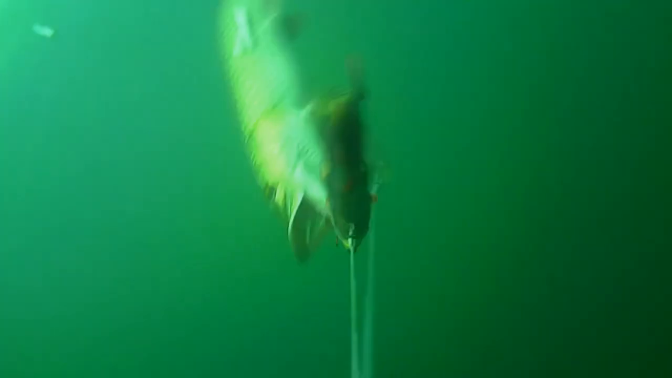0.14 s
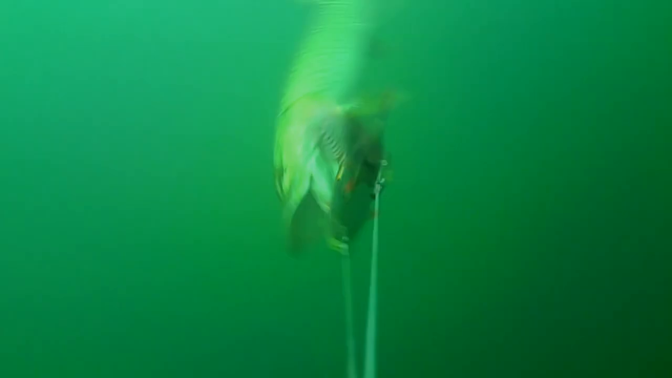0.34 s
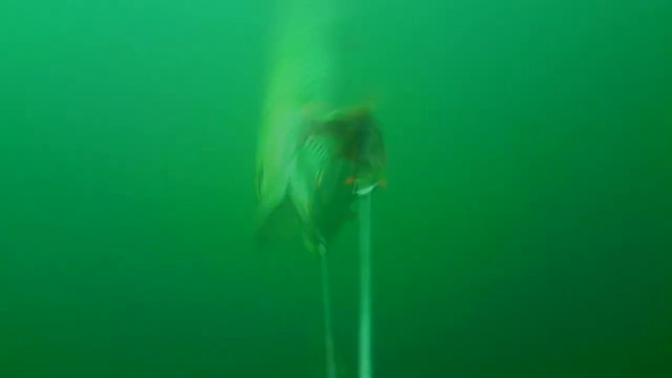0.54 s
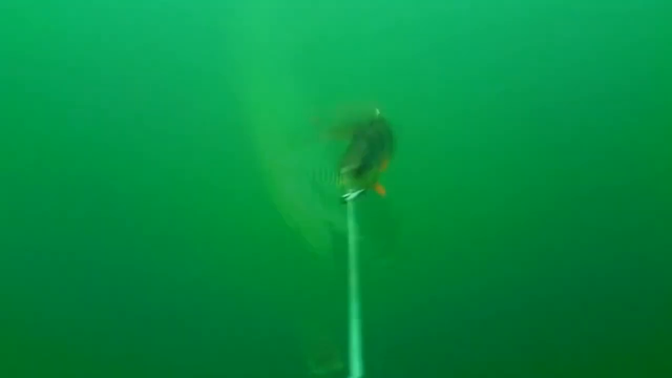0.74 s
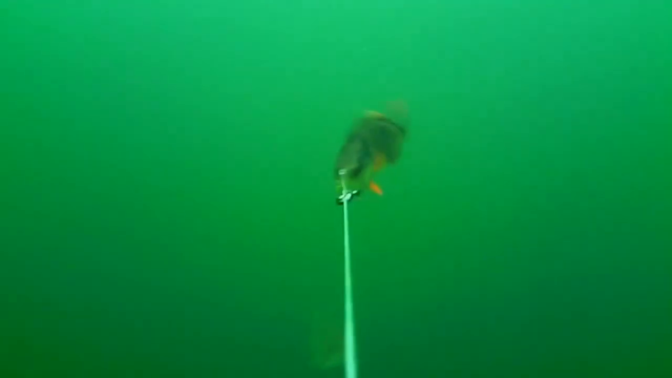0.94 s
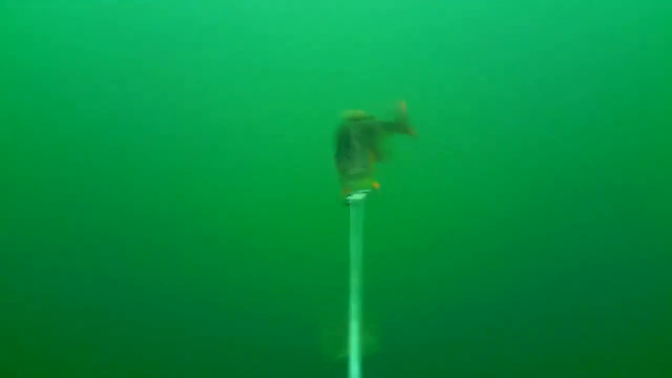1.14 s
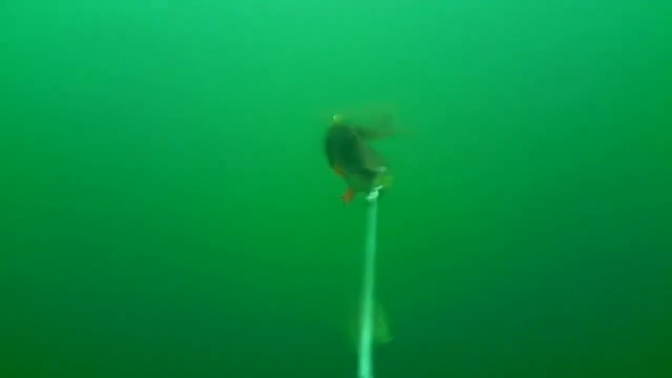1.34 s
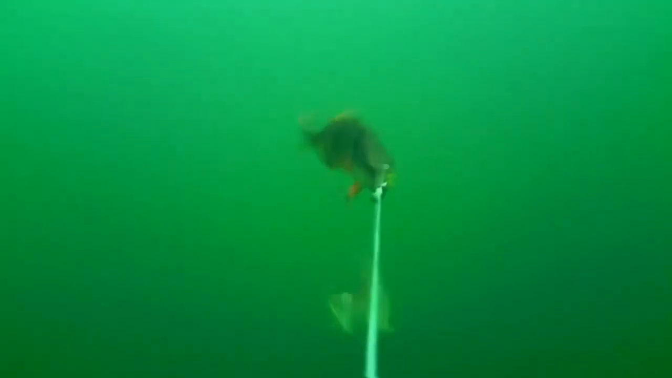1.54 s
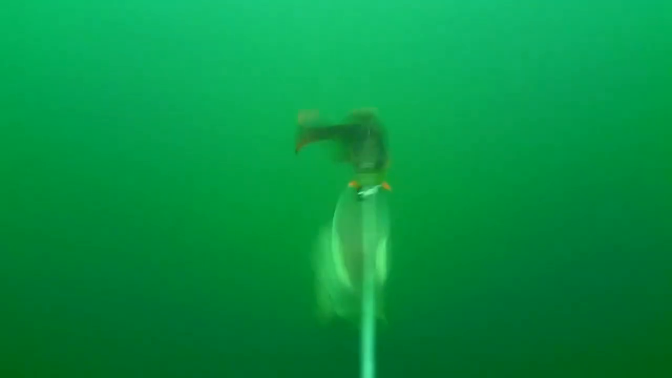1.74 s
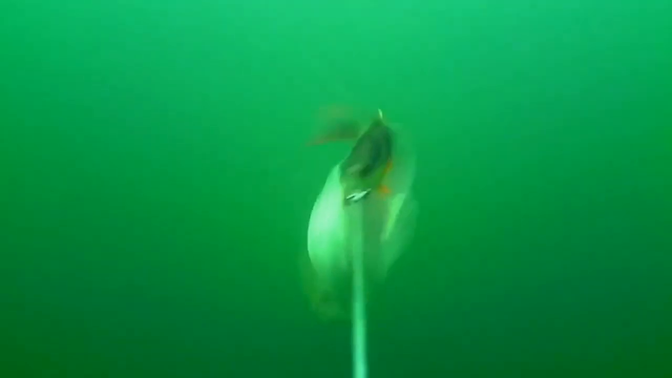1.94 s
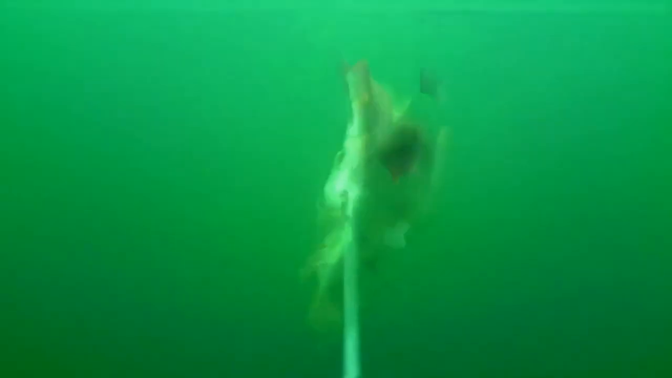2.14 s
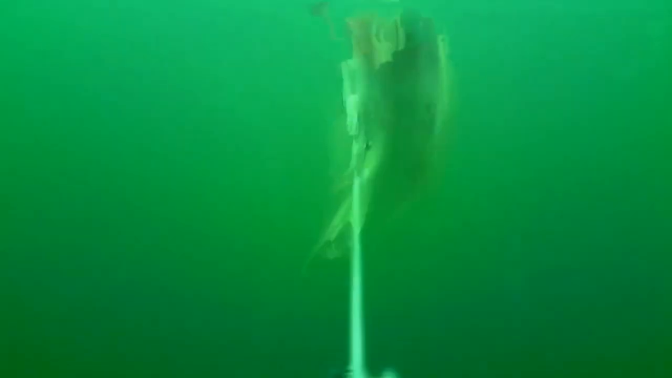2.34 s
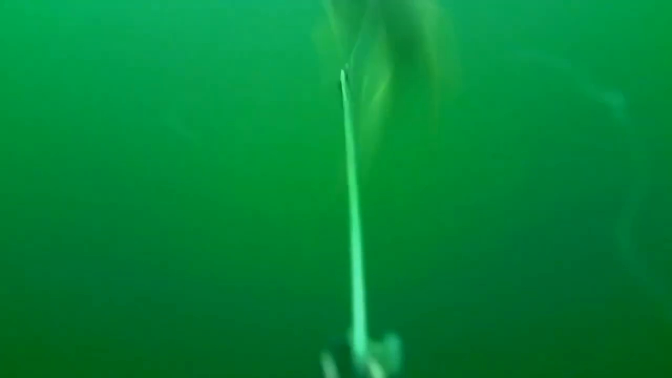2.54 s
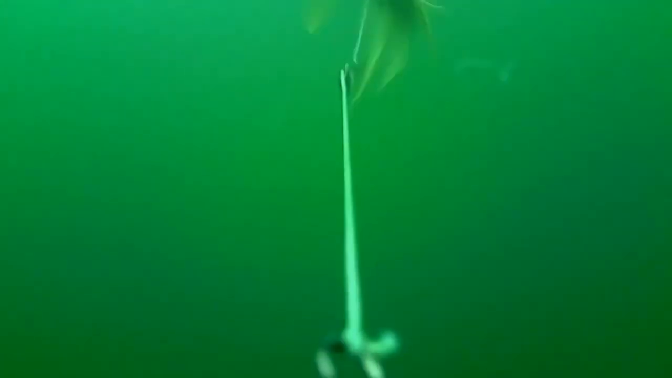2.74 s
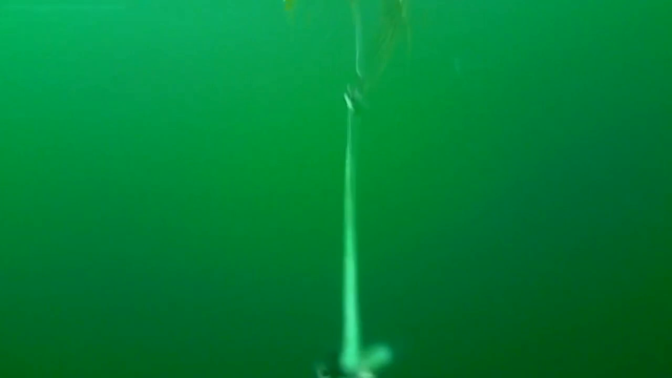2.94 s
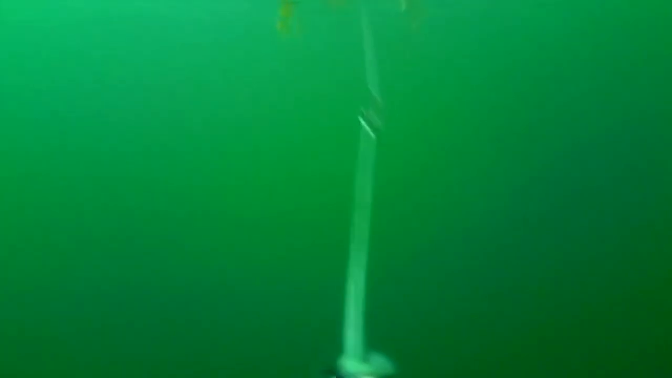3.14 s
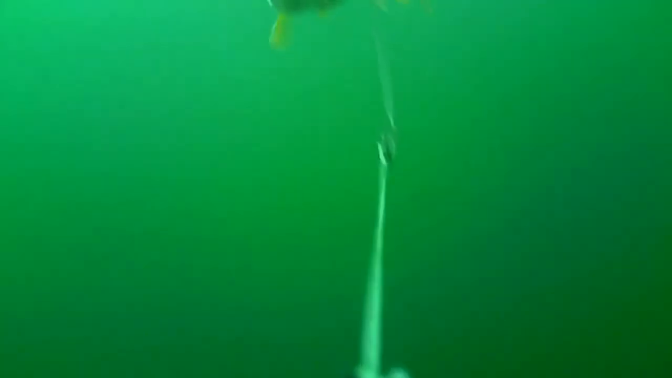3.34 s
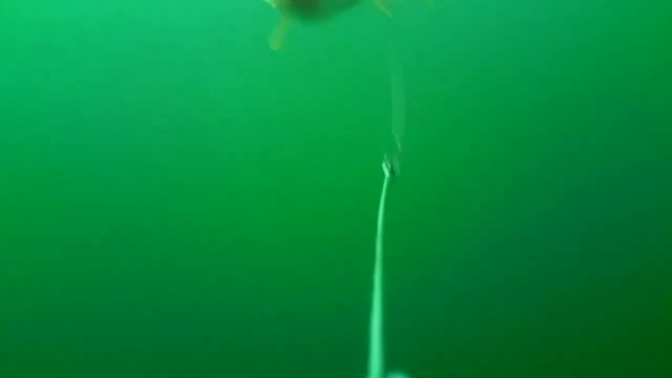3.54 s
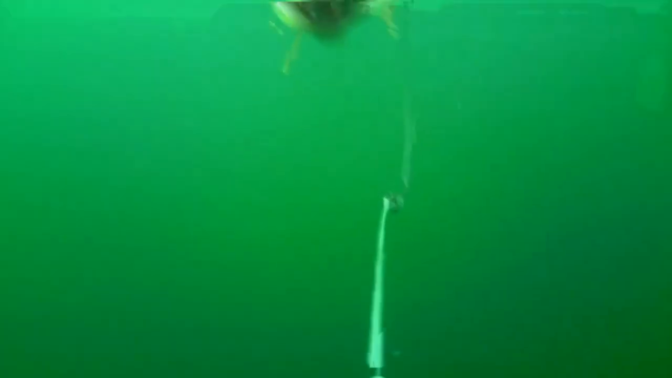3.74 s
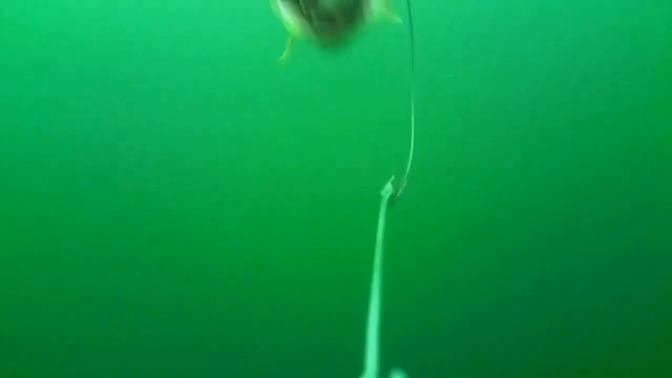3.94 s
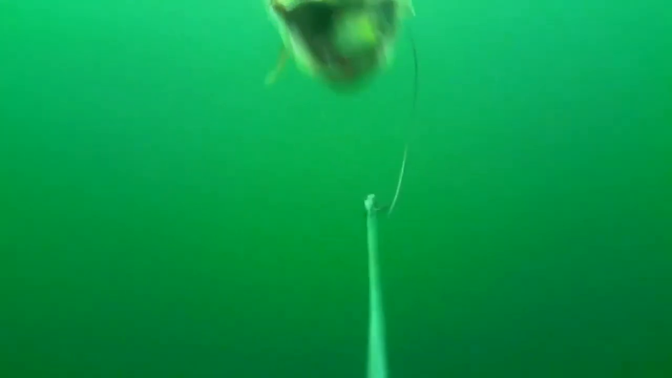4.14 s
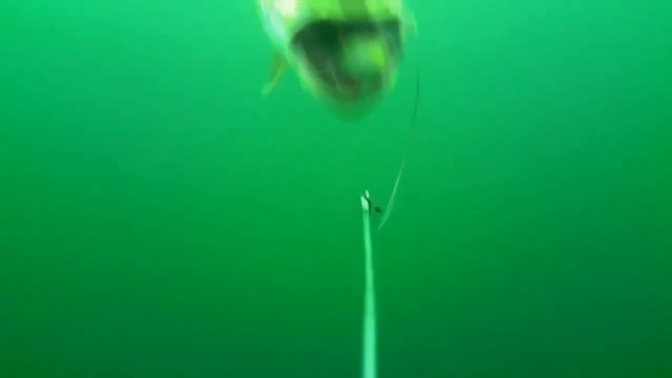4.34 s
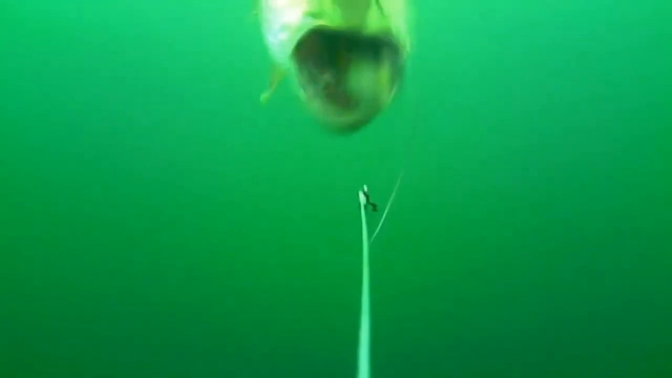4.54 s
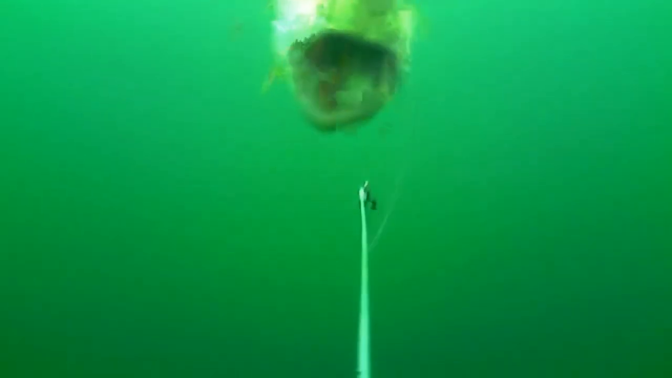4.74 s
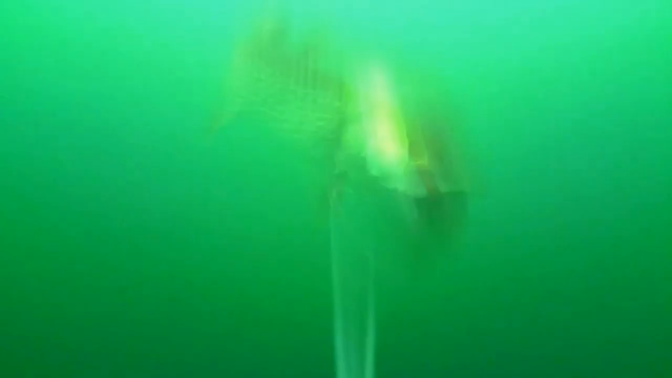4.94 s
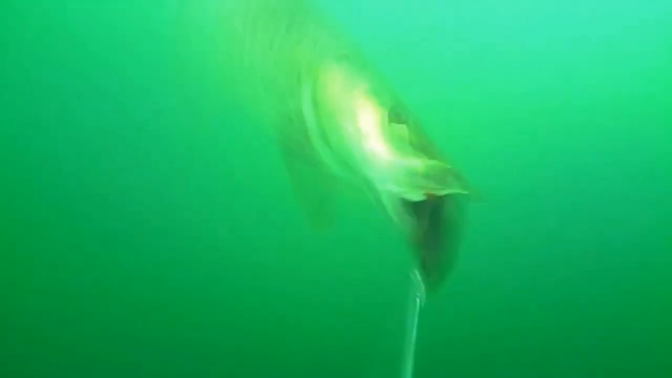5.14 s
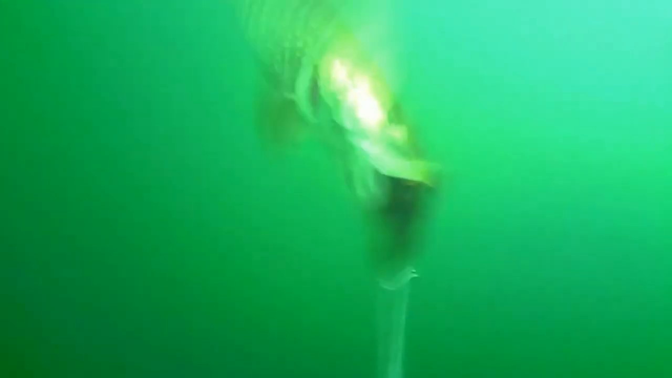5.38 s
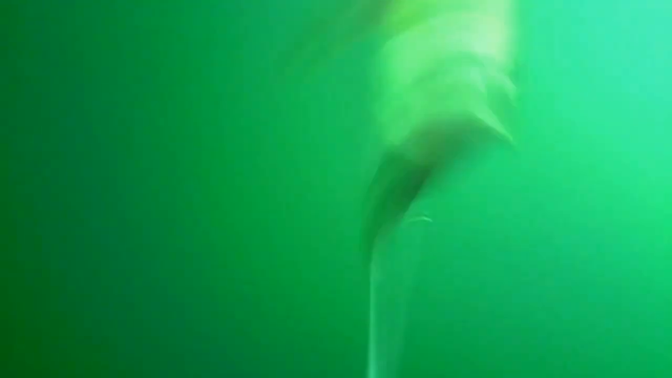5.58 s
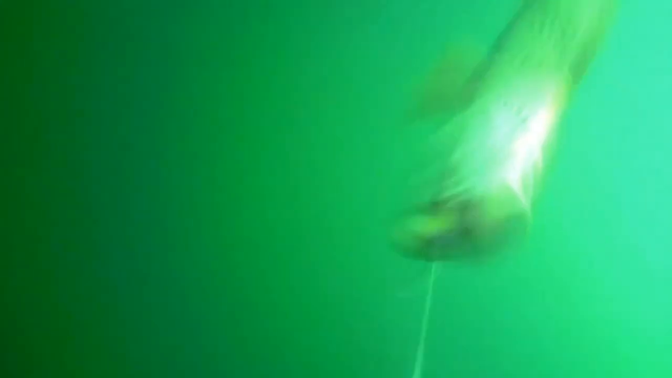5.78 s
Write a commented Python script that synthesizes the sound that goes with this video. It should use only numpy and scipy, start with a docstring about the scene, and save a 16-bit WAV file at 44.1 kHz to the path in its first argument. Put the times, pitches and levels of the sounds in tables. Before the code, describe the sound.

A fish strikes a lure towed in front of an underwater camera. A brief, high, speeded-up clatter cuts to a muffled water rumble and soft hiss, with light taps and a rubbing line. Hollow knocks bunch into a loud rattle, thin to faint ticks while a soft low moan passes, then return in the loudest, slightly distorted flurry. Everything is heard close, from inside the sealed housing.

```python
"""A fish strikes a towed underwater camera

A small camera in a sealed housing is towed on a line; a fish strikes the lure and jerks it.
Every tug knocks the housing, which rings briefly. The line rubs, the flow buffets the housing,
the microphone hisses, and a soft low moan passes. The first half second runs four times
as fast, with a short drop-out, then the sound cuts to about normal speed."""
import sys
import numpy as np
from scipy.fft import rfft, irfft, next_fast_len
from scipy.io import wavfile
from scipy.ndimage import map_coordinates

SR = 44100
rng = np.random.default_rng(int(sys.argv[2]) if len(sys.argv) > 2 else 0)


def generate_wav(sig):
    """Save sig (samples, or channels by samples) to the path in sys.argv[1] as 16-bit PCM at SR."""
    pcm = np.round(np.clip(np.atleast_2d(sig).T, -1, 1) * 32767).astype(np.int16)
    wavfile.write(sys.argv[1], SR, pcm)


N = 256220
CUT_S, FAST_SPEED = .473, 4  # speed raises pitches and shortens rings; tables are for speed 1
CAMERA_RATE_HZ, TOP_HZ = 8000, 15929


def amp(db):
    """Turn decibels into a gain."""
    return 10 ** (np.asarray(db) / 20)


def unit(x):
    """Scale a sound to an average (rms) level of 1."""
    return x / np.sqrt(np.mean(x ** 2) + 1e-20)


def curves(rows):
    """One value per sample for each column after the time."""
    times, *columns = np.transpose(rows)
    return [np.interp(np.arange(N) / SR, times, column) for column in columns]


def wobble(rate):
    """A smooth curve through `rate` random points a second."""
    return map_coordinates(rng.standard_normal(int(N * rate / SR) + 4), [np.arange(N) * rate / SR])


def filtered(x, response):
    """Weight each frequency in x by response(Hz)."""
    size = next_fast_len(x.shape[-1] + SR // 4)
    return irfft(rfft(x, size) * response(np.fft.rfftfreq(size, 1 / SR)), size)[..., :x.shape[-1]]


def modes(table, f):
    """How strongly a set of modes (the tones an object rings at) answers each frequency f."""
    return sum((-1) ** k * amp(db) * 1j * f * width / (hz * hz - f * f + 1j * f * width)
               for k, (hz, width, db) in enumerate(table))


def band(hz, width, f):
    """A filter shape that favours frequencies near hz."""
    return modes([(hz, width, 0)], f) ** 2


def coloured(points, speed):
    """Noise whose spectrum follows (f/Hz, level/dB) points."""
    f, db = np.transpose(points)
    shape = lambda hz: amp(np.interp(np.log(hz / speed + 1), np.log(f + 1), db))
    return unit(filtered(rng.standard_normal(N), shape))


# Tone of the hiss (first and last rows not played): f/Hz, level/dB
HISS_SPECTRUM = [(65, -31), (110, -2), (167, -5), (480, -8), (665, -16.5), (796, -12), (3850, -12.5),
                 (5000, -47.5), (8470, -120)]

def hiss(speed, level_db):
    """The microphone and the water hiss steadily."""
    return amp(level_db) * coloured(HISS_SPECTRUM[1:-1], speed)


# Faint copies of the sound in the treble: f/Hz (where it is mirrored), level/dB
MIRROR_POINTS = [(4000, -53.5), (8000, -63), (12000, -67), (16000, -68)]

def mirror_images(x):
    """Raising the sample rate leaves faint mirror images of the loud low tones in the treble."""
    carrier = sum(amp(db) * np.cos(2 * np.pi * hz * np.arange(N) / SR) for hz, db in MIRROR_POINTS)
    images = filtered(x, lambda hz: hz > 250) * carrier
    return filtered(images, lambda hz: hz > CAMERA_RATE_HZ / 2)


# Loudness of the moan: t/s, level/dB
MOAN_SWELL = [(3.2, -89.5), (3.32, -55), (3.5, -59), (3.68, -62), (3.8, -67), (3.9, -93)]

def moan():
    """A narrow band of noise near 70 Hz swells and fades."""
    spectrum = [(50, -41.5), (65, 13.5), (90, 0.5), (120, -42.5), (300, -120)]
    return amp(curves(MOAN_SWELL)[0]) * coloured(spectrum, 1)


# Tone of the water's rumble: f/Hz, level/dB
BUFFET_SPECTRUM = [(8, 9), (30, -4.5), (60, -14), (110, -17.5), (200, -57.5)]

def water_flow(level_db, speed):
    """Flow buffets the housing, and its swaying adds slow pressure swings."""
    buffet = amp(level_db + 1.3 * wobble(6 * speed)) * coloured(BUFFET_SPECTRUM, speed)
    sway = amp(-55) * wobble(5 * speed)
    return buffet + sway


def line_rub(pitch_hz, speed, lumpy_db):
    """The line drags in its eye: lumpy noise rings mostly the body mode nearest its pitch."""
    drag = rng.standard_normal(N) * amp(lumpy_db * wobble(45 * speed))
    ring = np.zeros(N)
    for hz, width, _ in BODY_MODES:
        nearness = np.exp(-(np.log(pitch_hz / hz) / 0.32) ** 2)
        ring += nearness * filtered(drag, lambda f: band(hz, 0.97 * width, f / speed))
    for group, db in (THUMP_MODES, -11.5), (RAP_MODES, -17), (CLICK_MODES, -39.5):
        ring += amp(db) * filtered(drag, lambda f: modes(group, f / speed))
    return unit(ring)


# The strain of towing: t/s, rub level/dB, buffet level/dB, rub f/Hz
TOW_STRAIN = [(0, -40, -42, 516), (.05, -50, -54, 488), (.1, -43, -49, 519.4), (.27, -52, -59.5, 499.4),
              (.45, -45.5, -63.5, 480.4), (.48, -57.5, -72, 350), (.64, -57, -43, 400),
              (.72, -60.5, -57, 368.3), (1.4, -58.5, -56, 380.6), (2.05, -66.5, -53.5, 424.6),
              (2.2, -29.5, -28, 487), (2.4, -52, -60, 485.4), (2.5, -48.5, -56, 427.4),
              (2.7, -63.5, -52.5, 491), (3.45, -62, -53.5, 490), (4.5, -67.5, -59.5, 468),
              (5.0, -61.5, -60, 489), (5.1, -37.5, -25.5, 512), (5.18, -25.5, -42, 510),
              (5.25, -34, -30, 481.5), (5.57, -47, -45, 480), (5.65, -20, -40, 516),
              (5.81, -40.5, -45, 408)]

def towing(speed, lumpy_db):
    """Rubbing and buffeting rise and fall with the strain on the line."""
    rub_db, buffet_db, pitch_hz = curves(TOW_STRAIN)
    return amp(rub_db) * line_rub(pitch_hz, speed, lumpy_db) + water_flow(buffet_db, speed)


# The housing's ringing tones in four groups, low to high: f/Hz, width/Hz, level/dB
THUMP_MODES = [(208, 41, 4.5)]
BODY_MODES = [(345, 148, -1.5), (489, 98, -0.64), (634, 75, 0.91)]
RAP_MODES = [(824, 34, -1.5), (935.6, 130, -4), (1053, 77, -4.5), (1306, 300, -11)]
CLICK_MODES = [(1938, 61, 2.5), (2327, 290, -13.5), (2750, 33, -12), (3530, 360, -19.5)]

def knock(body_db, pitch_hz, rap_db, click_db, shake_ms, speed, rap_width_hz):
    """A tug shakes the housing briefly and rings each group of modes at its own strength."""
    t = np.arange(4096) / SR * speed
    size = 2 * len(t)  # room to ring out
    f = np.fft.rfftfreq(size, 1 / SR) / speed
    progress = t / (max(shake_ms, 4) / 1000)
    thump_db = rng.normal(-17.5, 4)
    shake = rng.standard_normal(len(t)) * np.minimum(t / 0.0011, 1)
    soft = rfft(shake * amp(-30 * progress ** 2), size)
    sharp = rfft(shake * amp(-40 * progress), size)
    # The pull of the line favours one pitch, which also sounds as a round plop.
    body = irfft(soft * modes(BODY_MODES, f) * band(pitch_hz, 300, f))
    plop = np.sin(2 * np.pi * pitch_hz * t) * amp(-24 * progress ** 2) * (1 - np.exp(-t / 0.0029))
    body[:len(t)] += 1.2 * np.abs(body).max() * plop
    thump = irfft(soft * modes(THUMP_MODES, f) * band(220, 300, f))
    rap = irfft(sharp * modes(RAP_MODES, f) * band(963, rap_width_hz, f) ** 2)
    click = irfft(sharp * modes(CLICK_MODES, f) * band(3000, 3800, f))
    groups = (body, 0), (thump, thump_db), (rap, rap_db), (click, click_db)
    return sum(amp(body_db + db) * ring / np.abs(ring).max() for ring, db in groups)


# Tugs on the line: t/s, body peak level/dB, f/Hz, rap level/dB, click level/dB, shake length/ms
# (rap and click levels are relative to the body)
TUGS = [(0.0094, -28, 322, 8.5, -10, 21), (0.016, -27.5, 337, -3, -16, 11), (0.0196, -27, 372, -3, -31, 15),
        (0.0484, -43.5, 649, 11, -13, 20), (0.0548, -44, 640, 20, -20, 27), (0.0683, -28, 445, -8, -16, 11),
        (0.0867, -27, 350, -4, -33, 20), (0.0882, -36, 464, -2, -19, 26), (0.0958, -26, 374, -7, -21, 19),
        (0.1012, -24, 355, -3.5, -16, 25), (0.115, -31.5, 455, -18, -25, 18),
        (0.1183, -24, 346, -18, -23, 17), (0.1234, -27, 440, -31, -31, 27),
        (0.1376, -22, 363, -2.5, -10.5, 23), (0.1564, -33.5, 470, -30, -26.5, 22),
        (0.2145, -31, 445, 0, -19, 16), (0.2554, -34, 436, -12, -21, 18), (0.42, -30.5, 420, 1, -21, 20),
        (0.4392, -36, 606, -8, -19, 25.7), (0.4524, -35, 424, -23, -40, 26),
        (0.466, -33.5, 460, -11, -24, 23), (0.481, -49, 328, -19, -22, 16),
        (0.519, -44.5, 460, -2, -25, 18), (0.569, -40.5, 330, -10.5, -22, 24),
        (0.635, -23, 549, -15, -33, 33), (0.646, -22, 467, -29, -31, 16), (0.731, -49, 360, -12, -20, 15),
        (0.841, -41, 410, -13, -30, 15), (0.896, -43, 365, -16, -28, 9.8),
        (0.993, -44.5, 300, -9, -31.5, 16), (1.098, -50.5, 403, -5.5, -20, 38),
        (1.152, -64, 348, -12, -20, 26), (1.213, -55, 312, -5, -20, 13), (1.263, -46, 377, -11, -22, 21),
        (1.303, -49, 420, -9, -22, 41), (1.324, -46.5, 395, -20, -24, 16), (1.364, -47, 340, -18, -25, 28),
        (1.413, -24, 563, -32, -46, 9.8), (1.46, -35.5, 348, -8.5, -34, 22),
        (1.478, -45, 368, -10, -27, 25), (1.535, -46.5, 455, -15, -18, 11),
        (1.589, -40.5, 348, -16, -33, 28), (1.633, -51, 322, -13, -21, 12), (1.69, -48.5, 390, -9, -20, 30),
        (1.744, -42, 360, -15, -26, 22), (1.874, -18, 633, -35, -30.5, 11.3),
        (1.884, -23.5, 616, -17, -32, 16), (1.907, -33.5, 660, -5, -16, 14),
        (1.975, -42, 364, -10.5, -31.5, 27), (2.042, -43.5, 392, -16, -24, 14),
        (2.102, -44.5, 295, -13, -24, 15), (2.13, -23, 666, -24, -23, 22),
        (2.142, -11, 664.4, -19.5, -34, 18.5), (2.16, -5, 488, -21, -37.5, 18),
        (2.176, -15.5, 475, -12.5, -28, 13.5), (2.192, -14, 569, -13, -17, 22.4),
        (2.218, -17, 500, -13.5, -36, 20), (2.243, -25, 630, -9.5, -26.5, 20),
        (2.274, -31, 495, -9.5, -19, 52), (2.289, -6, 507, -1, -19.5, 23.3),
        (2.298, -6.5, 489, -7, -14, 25), (2.309, -12.5, 585, -4.5, -40, 14),
        (2.382, -39, 441, -11, -15, 7.5), (2.401, -41.5, 614, -15, -37, 11),
        (2.432, -36.5, 425, -1, -1.5, 24), (2.48, -35, 656, -3.5, -18, 13),
        (2.513, -29, 390, -21.5, -44.5, 25), (2.544, -38, 635, -11.5, -18, 19),
        (2.57, -20.5, 441, -13.5, -34, 15), (2.58, -29.5, 459, -10, -26, 25),
        (2.607, -39, 317, -16, -37, 21), (2.66, -39, 642, -8, -8.5, 12), (2.748, -47, 600, -10, -16.5, 16),
        (2.772, -45.5, 430, -9.5, -32, 16), (2.841, -41.5, 446, -16.5, -27, 15),
        (2.938, -44, 347, -19, -31.5, 16), (3, -53, 656, -11, -20, 15), (3.052, -45.5, 511, -9.5, -25, 19),
        (3.131, -47.5, 610, -38, -23, 11.4), (3.303, -44, 343, -19, -29, 9.8),
        (3.37, -48, 527, -7.5, -22, 24), (3.413, -40, 507, -4, -7, 23), (3.535, -45, 366, -5, -32, 23),
        (3.558, -45, 616, -27, -31, 19), (3.584, -48.5, 630, -18, -20, 25),
        (3.625, -48.5, 486, -20.5, -23, 24), (3.684, -36.5, 456, -24.5, -31, 14.4),
        (3.711, -43.5, 586, -44, -25.5, 25), (3.935, -54, 504, -24, -17.5, 16),
        (4.349, -45.5, 617, -11, -4.5, 16), (4.706, -46, 465, -2.5, -6, 20),
        (4.863, -51.5, 476, -10.5, -14.5, 17), (4.91, -47, 462, -20, -21, 12),
        (4.933, -32.5, 471, -26, -32, 35), (4.989, -50.5, 519, -3.5, -4, 22),
        (5.014, -38.5, 503, -24, -29, 21), (5.027, -34, 609, -28, -34, 16), (5.052, -41, 627, -24, -39, 21),
        (5.07, -29, 570, -37, -46, 17), (5.09, -13, 545, -9, -16, 12.8), (5.138, 3.5, 601, -6.5, -16, 15.6),
        (5.147, 0, 504, -10, -8.5, 19), (5.173, -9.5, 478, -1.5, -17.5, 19.6),
        (5.187, -21.5, 495, 0.5, -36, 16), (5.225, -19, 337, -13, -45.5, 12.5),
        (5.236, -27.5, 316, 2.5, -0.5, 21), (5.257, -11, 485, -34.5, -39, 17.5),
        (5.271, -18, 526, -6, -30, 13), (5.289, -13.5, 500, -3.5, -20, 16),
        (5.301, -14, 398, 1, -12.5, 15.5), (5.323, -14.5, 512, -3, -23.5, 18),
        (5.36, -13.5, 454, -15.5, -34, 9.1), (5.394, -29.5, 493, -3, -17, 42),
        (5.41, -30.5, 396, -19.5, -36.5, 21), (5.436, -34, 637, -17.5, -30.5, 15),
        (5.453, -29, 530, -6.5, -25, 20), (5.477, -23.5, 670, -22, -42, 21), (5.499, -22, 424, 3, -24, 14),
        (5.553, -32, 556, -7, -29, 16), (5.593, -45, 648, 6, -14.5, 20), (5.623, -4.5, 551, 2.5, -13, 13.3),
        (5.634, 0, 539, -9.5, -26, 16.6), (5.653, -15, 374, 4.5, -12, 26),
        (5.659, -13, 482, -19, -35.5, 10), (5.682, -16.5, 476, 1.5, -12, 24),
        (5.696, -21.5, 460, -14, -10, 18.4), (5.717, -29, 582, 1.5, -30, 16),
        (5.74, -18.5, 413, -13.5, -42, 23.6), (5.799, -36.5, 487, 5.5, -23, 20)]

def fish_tugs(from_s, until_s, speed, rap_width_hz):
    """The fish jerks the line: one knock for each tug in this stretch of time."""
    track = np.zeros(N)
    for start_s, *settings in TUGS:
        if from_s <= start_s < until_s:
            start = round(start_s * SR)
            sound = knock(*settings, speed, rap_width_hz)[:N - start]
            track[start:start + len(sound)] += sound
    return track


def camera(x, speed, hiss_db):
    """The camera clips hard blows and samples slowly, so little lies above half its rate."""
    clip_level, hardness = 0.69, 4.8
    clipped = x / (1 + np.abs(x / clip_level) ** hardness) ** (1 / hardness)
    edge_hz = CAMERA_RATE_HZ * speed / 2
    passed = lambda hz: np.clip((1.0384 * edge_hz - hz) / (0.055 * edge_hz), 0, 1)
    # The crack of clipped blows leaks past the filter.
    leak = lambda hz: amp(-28.5) * np.minimum(edge_hz / (hz + 1), 1) ** 3
    muffled = filtered(clipped, lambda hz: np.maximum(passed(hz), leak(hz)))
    return muffled + filtered(hiss(speed, hiss_db), passed)


# The drop-out in the fast opening: t/s, level/dB
DROP_OUT = [(0, 0), (.2695, 0), (.271, -90), (.408, -90), (.409, -22), (.437, -14), (.439, 0)]

def scene():
    """The fast opening, then a hard cut to about normal speed."""
    fast = fish_tugs(0, CUT_S, FAST_SPEED, rap_width_hz=600) + towing(FAST_SPEED, lumpy_db=2.5)
    fast = camera(fast, FAST_SPEED, hiss_db=-66.5) * amp(curves(DROP_OUT)[0])
    speed = 0.97
    normal = fish_tugs(CUT_S, N / SR, speed, rap_width_hz=1070) + towing(speed, lumpy_db=4)
    normal = camera(normal, speed, hiss_db=-63.5)
    normal = normal + mirror_images(normal) + moan()
    return np.where(np.arange(N) < CUT_S * SR, fast, normal)[None]


def record(dry):
    """Add a trace of noise after the cut and remove the highest treble."""
    trace = amp(-100) * rng.standard_normal(N) * (np.arange(N) > CUT_S * SR)
    return filtered(dry + trace, lambda hz: hz < TOP_HZ)


dry = scene()
out = record(dry)
generate_wav(out)
```